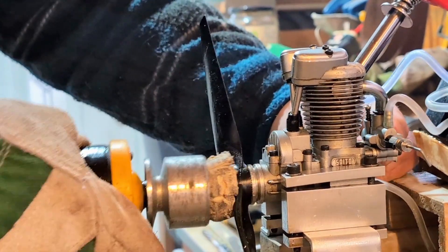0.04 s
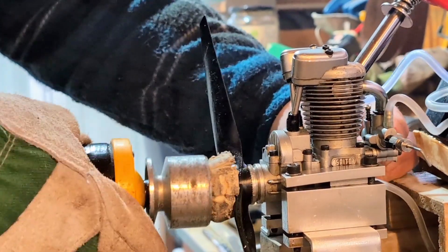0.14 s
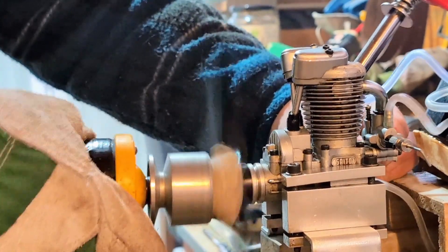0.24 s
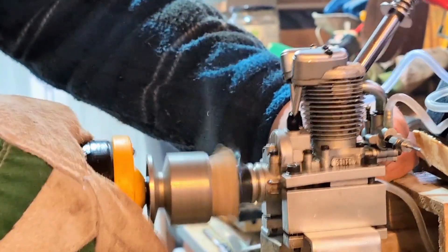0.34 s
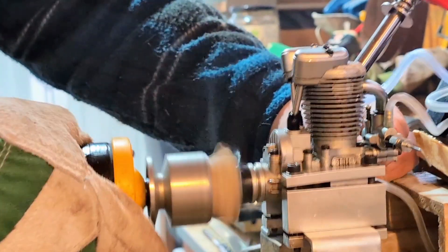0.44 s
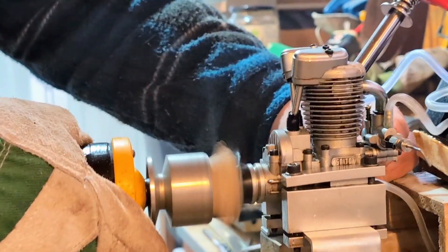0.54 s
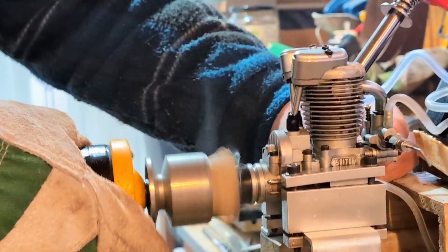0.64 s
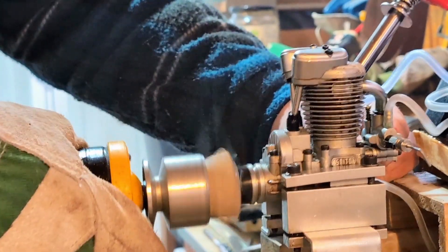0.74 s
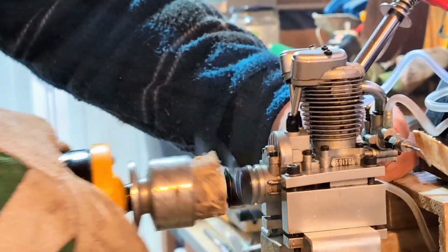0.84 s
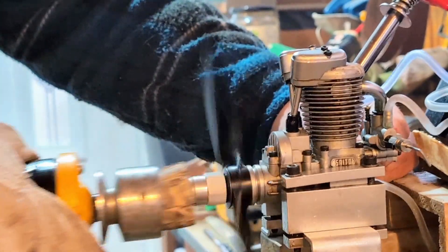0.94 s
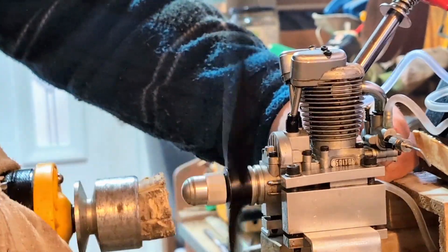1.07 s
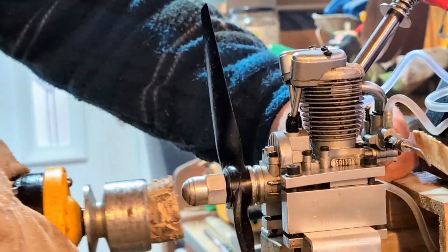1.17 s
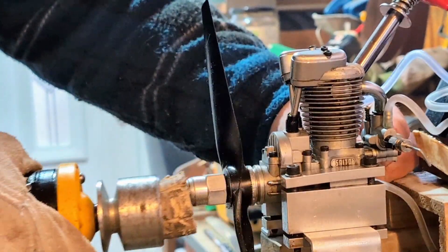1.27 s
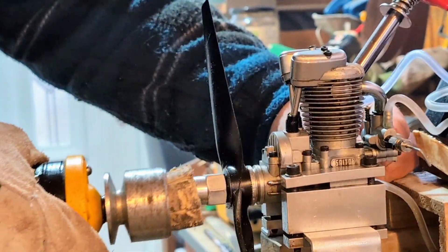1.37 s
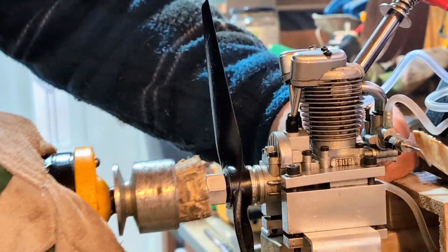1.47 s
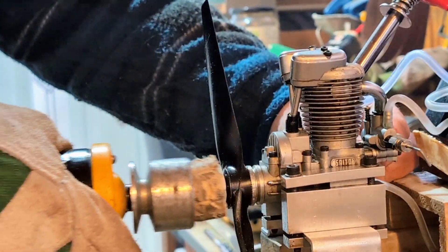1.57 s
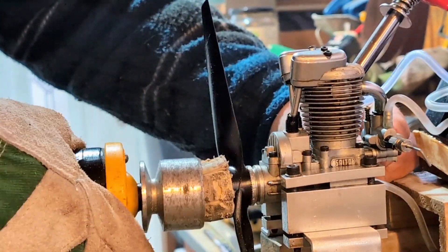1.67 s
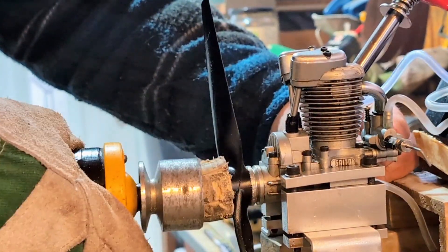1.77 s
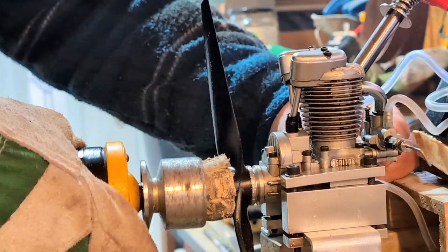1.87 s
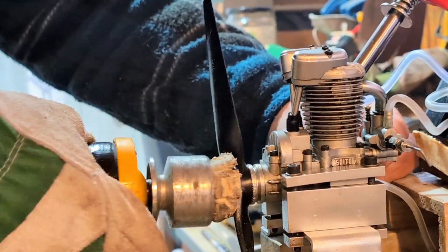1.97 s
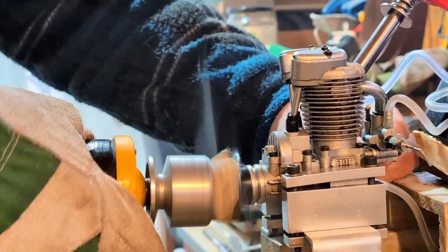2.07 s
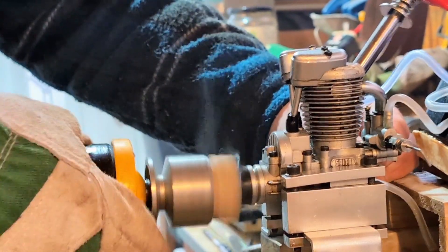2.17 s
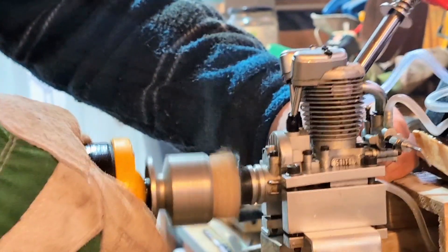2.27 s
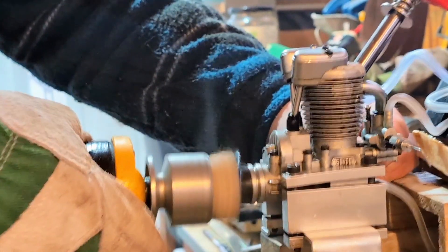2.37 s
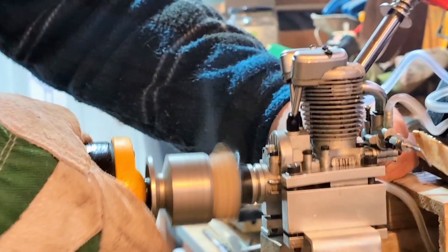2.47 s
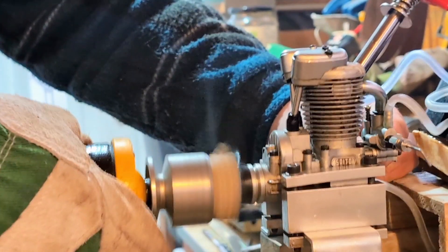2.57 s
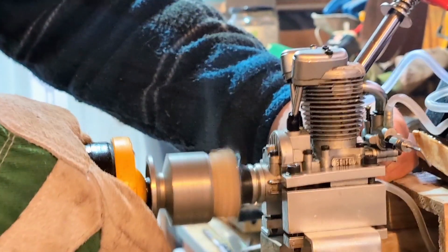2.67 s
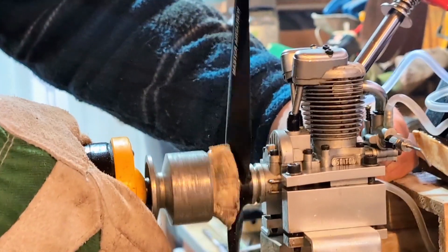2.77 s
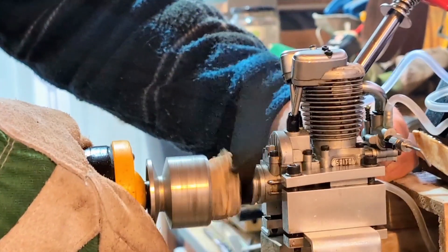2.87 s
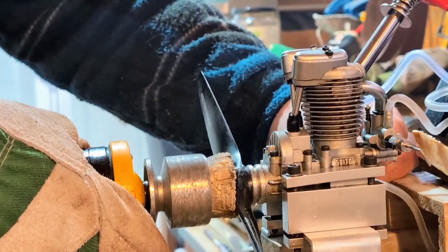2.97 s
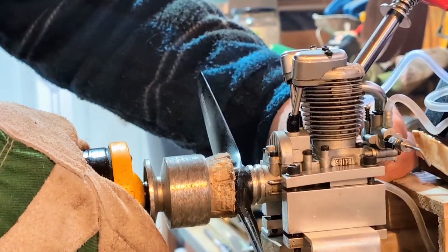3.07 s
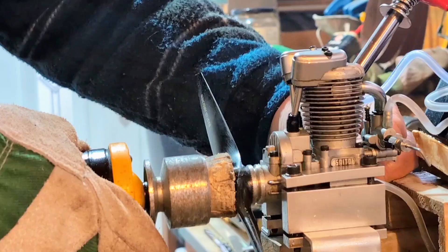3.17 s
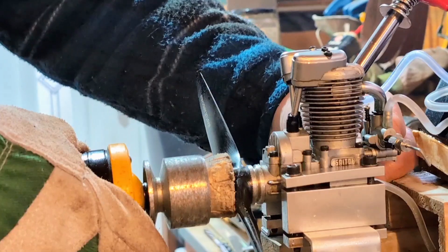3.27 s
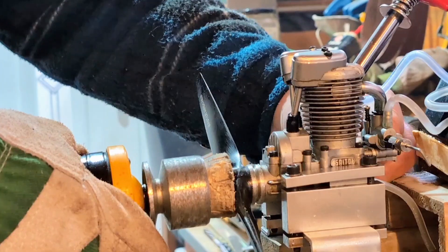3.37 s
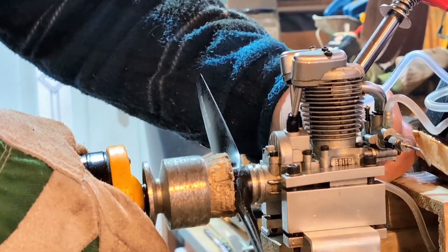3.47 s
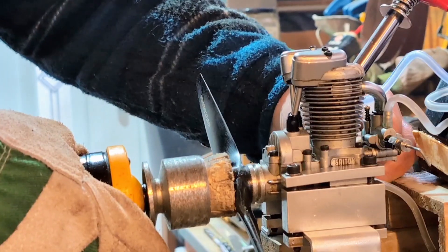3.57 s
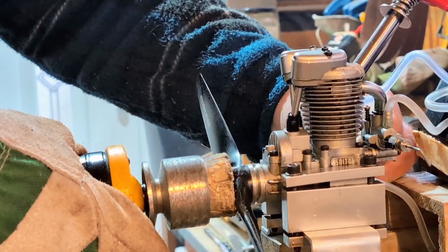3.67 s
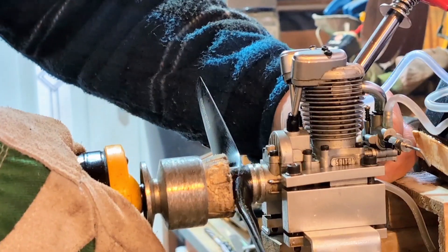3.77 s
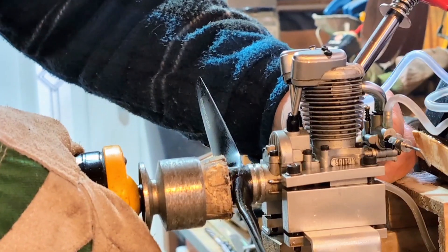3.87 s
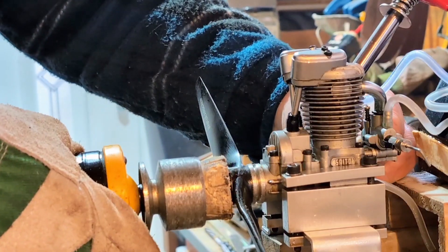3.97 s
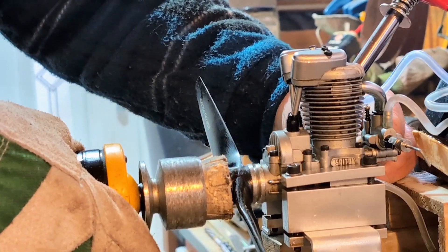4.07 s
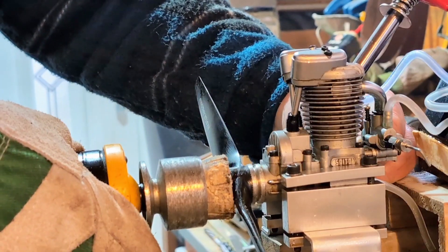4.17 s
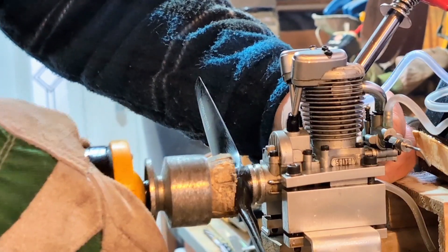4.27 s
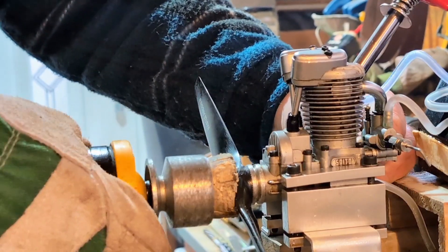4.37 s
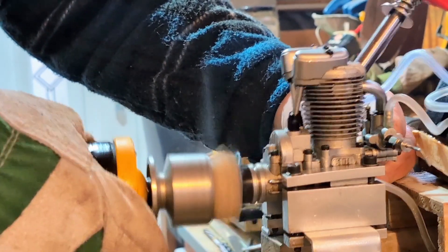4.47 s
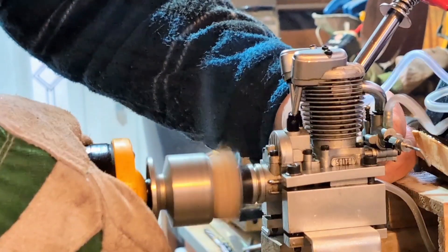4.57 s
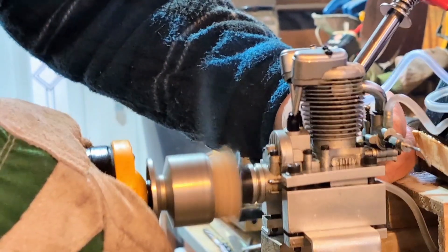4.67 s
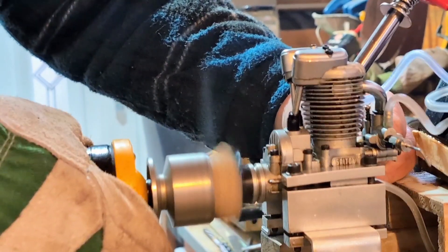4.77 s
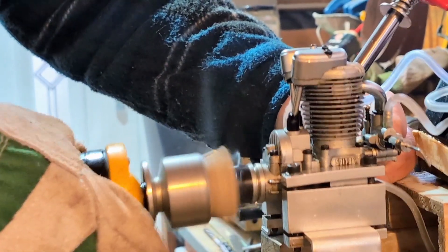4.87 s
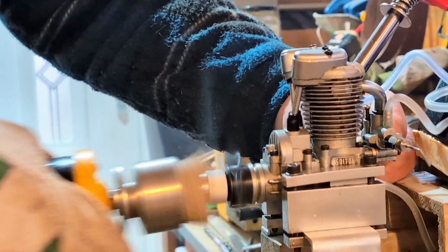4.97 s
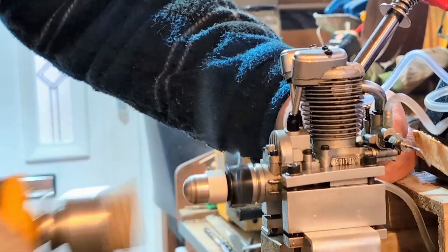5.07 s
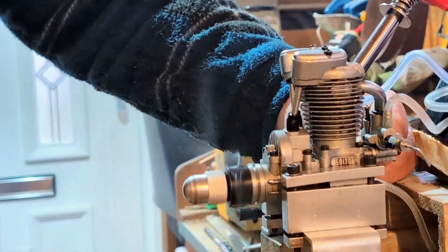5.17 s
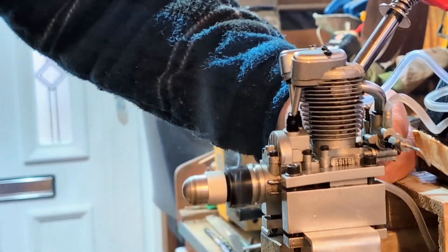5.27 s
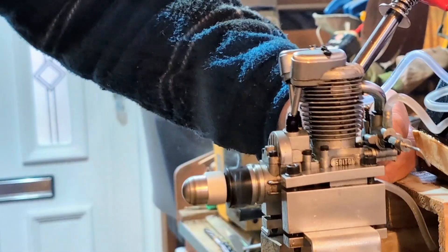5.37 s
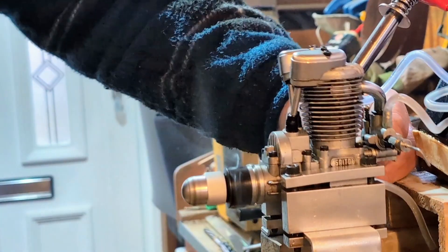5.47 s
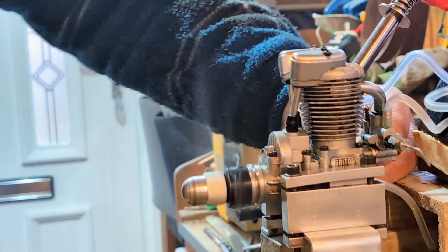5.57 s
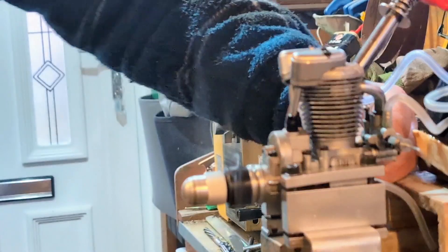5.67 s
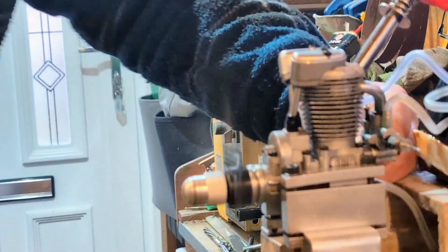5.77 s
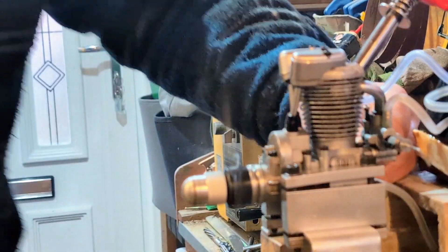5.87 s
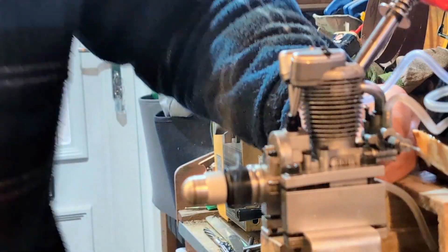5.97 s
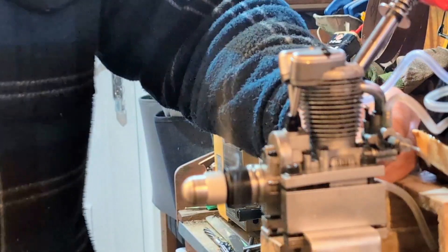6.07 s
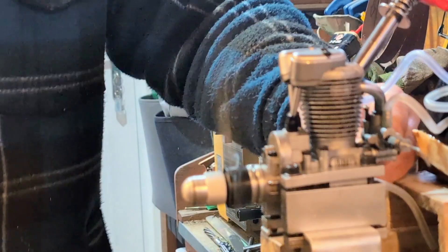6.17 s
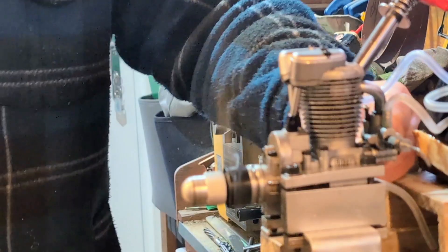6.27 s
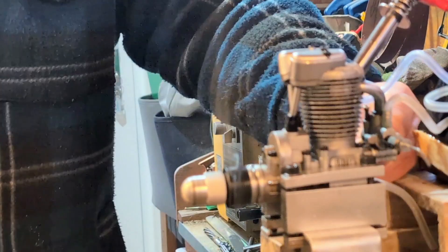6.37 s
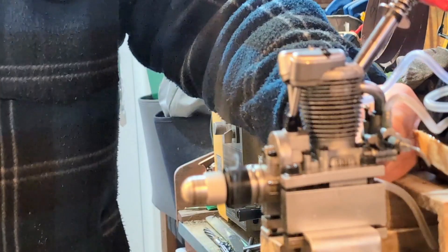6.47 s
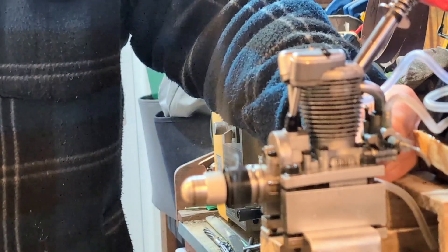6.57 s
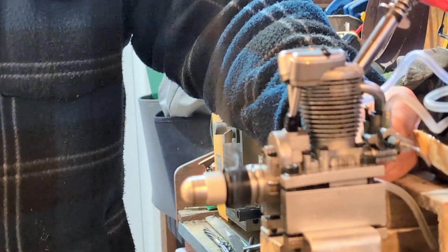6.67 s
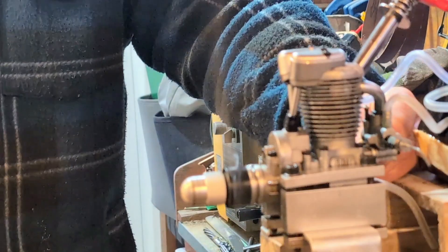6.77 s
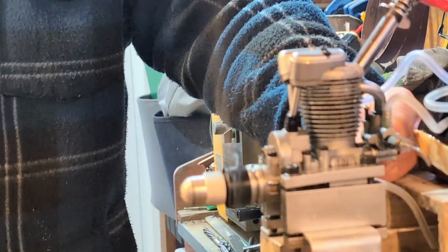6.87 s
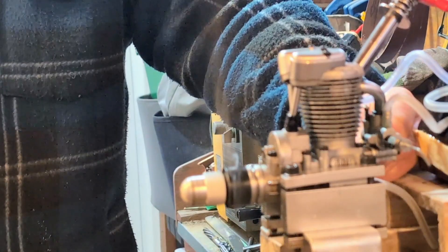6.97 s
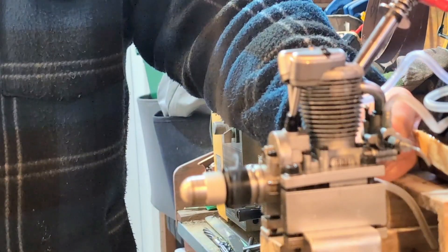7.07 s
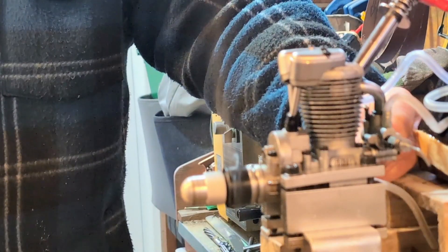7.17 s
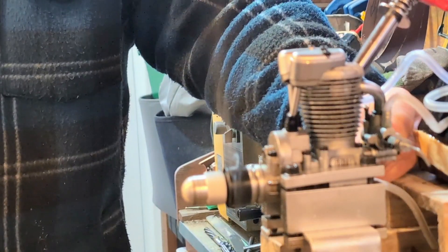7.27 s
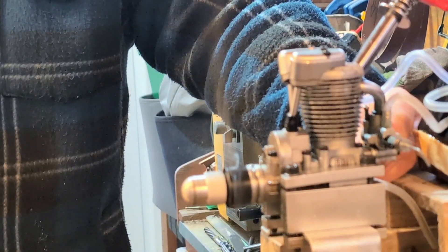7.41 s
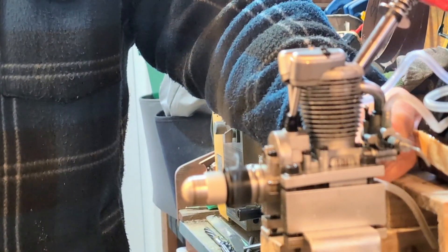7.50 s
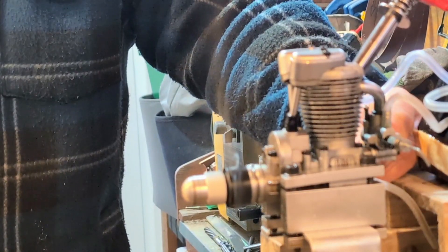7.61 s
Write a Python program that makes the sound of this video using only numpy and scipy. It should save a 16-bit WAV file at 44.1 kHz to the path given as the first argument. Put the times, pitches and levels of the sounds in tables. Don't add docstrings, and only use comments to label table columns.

```python
import sys
import numpy as np
from scipy import signal
from scipy.fft import rfft, irfft, next_fast_len
from scipy.io import wavfile
from scipy.ndimage import uniform_filter1d, map_coordinates

SR = 44100
rng = np.random.default_rng(int(sys.argv[2]) if len(sys.argv) > 2 else 0)


def volts_from_decibels(level):
    exponent = np.asarray(level, float) / 20
    return 10 ** exponent


def pcm_store(signal):
    levels = np.round(np.clip(np.atleast_2d(signal), -1, 1) * 32767)
    wavfile.write(sys.argv[1], SR, levels.astype(np.int16).T)


N = 336924
TIME_S = np.arange(N) / SR

# start_s, peak_db
POPS = [(4.638, -9.5), (4.688, -7), (4.729, -6.5), (4.7665, -9), (4.805, -6), (4.845, -7), (4.885, -6.5),
        (4.926, -7.5), (4.9675, -8.5), (5.0095, -7.5), (5.053, -8), (5.093, -5.5), (5.131, -7),
        (5.165, -5.5), (5.194, -9.5), (5.219, -11), (5.248, -8.5), (5.271, -8), (5.293, -6)]
# time_s, firing_rate_hz, exhaust_db
RUN = [(5.3, 45.2, -22), (5.37, 51, -17), (5.41, 51.5, -19), (5.5, 55.1, -18.5), (5.58, 56.0, -16.5),
       (5.72, 54.6, -18.5), (5.9, 50, -18), (6.07, 47.2, -18), (6.16, 52.2, -18.5), (6.24, 56, -19),
       (6.32, 58.5, -18), (6.55, 57.4, -19), (6.67, 61.7, -18), (6.8, 64.3, -18), (7.05, 67.3, -18),
       (7.18, 70.2, -18.5), (7.43, 76.2, -19), (7.64, 80.2, -20)]
# time_s, misfire (0 to 1)
MISFIRES = [(5.3, .24), (5.45, .06), (5.72, .05), (5.85, .1), (6.04, .15), (6.2, .14), (6.3, .04),
            (6.8, .06), (7.64, .06)]
# pitch_hz, level_db
PIPE = [(90, -24.5), (150, -6.5), (215, 2), (285, -3.5), (340, 1), (390, -3.5), (460, 2.5), (495, -2.5),
        (540, 3), (610, -3), (680, 2.5), (750, -6.5), (830, -3.5), (900, -7), (990, 0), (1110, -0.5),
        (1280, -10), (1500, -2.5), (1660, -2.5), (1800, -9), (1930, -5), (2150, -4.5), (2300, -19.5),
        (2900, -14.5), (3400, -22.5), (4500, -21.5), (7000, -35.5)]
# pitch_hz, left_minus_right_db
OUTLET_TILT = [(200, -3.5), (380, 0.5), (550, -2.5), (780, -4.5), (1100, -0.5), (1600, 0), (2200, 2.5),
               (3000, -0.5)]
# pitch_hz, level_db (per Hz)
ROAR = [(70, -23.5), (120, -8), (300, -8.5), (550, -12.5), (900, -14), (1650, -9.5), (2250, -3.5),
        (2960, -4), (3450, -7), (4370, -4.5), (5100, -7), (6240, -3), (9000, -9), (11600, -9.5),
        (12200, -17), (16000, -16.5)]
# pitch_hz, width_hz, level_db
FINS = [(2900, 100, -0.5), (4290, 170, -4.5), (5400, 110, 3.5), (6040, 270, -8)]
# pitch_hz, level_db (per Hz)
SIZZLE = [(5000, -41.5), (8000, -5.5), (10600, -1), (11700, -8), (12300, -6.5), (16000, -11)]
# delay_s, level_db
SPITS = [
    (0, 4),
    (.0023, -2),
    (.0056, -1),
]
# pitch_hz, level_db
ROCKING = [(46, -33), (52, -27.5), (55, -22.5), (58, -18.5), (63.5, -19.5), (66, -31), (71, -37.5),
           (80, -24)]
SHAFT = [(92, -28.5), (102, -42), (110, -32.5), (117, -29.5), (128, -30), (140, -24), (152, -30.5),
         (160, -26.5)]
PROPELLER = [(182, -20), (205, -23), (222, -21.5), (234, -29), (247, -34), (260, -22), (280, -24),
             (320, -19.5)]
# time_s, effort_db
CRANKING = [
    [(.325, -58.5), (.41, -40), (.542, -25.5), (.588, -22), (.74, -25.5), (.896, -32), (1.012, -47),
     (1.132, -55.5), (1.3, -73)],
    [(2.17, -85), (2.298, -30.5), (2.43, -28.5), (2.51, -24.5), (2.684, -23.5), (2.84, -29.5),
     (2.93, -38.5), (3.0, -53), (3.2, -81)],
    [(4.55, -77), (4.638, -25.5), (4.7, -24.5), (4.816, -23), (5.078, -25.5), (5.2, -24.5), (5.33, -22.5)],
]
# start_s, peak_db
PUFFS = [(0.3212, -44), (.408, -7.5), (.5151, -8.5), (0.569, -9), (0.6169, -8), (0.6609, -8), (0.71, -13),
         (0.7528, -10.5), (0.8115, -11), (0.895, -15.5), (2.2174, -32.5), (2.2711, -15.5), (2.346, -14.5),
         (2.4117, -9), (2.4662, -12), (2.506, -10), (2.5216, -10.5), (2.5658, -12), (2.609, -8),
         (2.658, -11), (2.706, -11.5), (2.748, -9.5), (2.8052, -12), (2.8816, -14), (2.998, -26.5),
         (4.572, -33), (4.581, -21.5), (4.657, -13)]
# start_s, peak_db
TICKS = [(.2385, -46), (.369, -29), (0.976, -21), (1.027, -15.5), (1.049, -20), (1.1053, -22),
         (1.1606, -33), (1.225, -52.5), (2.119, -26.5), (2.135, -20), (2.252, -13.5), (4.588, -17.5)]
# pitch_hz, level_db
GEARS = [(290, -49), (500, -13.5), (712, -11), (1130, -8), (2560, -9.5), (2900, -11.5), (3490, -7.5),
         (4980, -8.5), (6000, -12), (7800, -27.5), (13200, -120)]
# pitch_hz, width_hz, level_db
GEAR_PEAKS = [(970, 48, -1.5), (1150, 260, -9), (1665, 37, 1), (1830, 72, -6), (2080, 120, -1.5),
              (2903, 34, 7)]
# pitch_hz, level_db (per Hz)
RUMBLE = [(53, -40.5), (90, 2), (151, -7.5), (426, -6.5), (456, -5), (575, -40.5), (700, -20), (910, -40),
          (1540, -120)]
# pitch_hz, level_db (per Hz)
AIR = [(2060, -33), (3500, -7), (4970, -12), (5060, -10.5), (8800, -5.5), (9090, -13), (10900, -6.5),
       (13500, -13), (15700, -18.5), (16000, -39.5)]
# pitch_hz, width_hz, level_db
AIR_PEAKS = [(6520, 740, -0.5), (9350, 97, 3), (10640, 100, -3), (12400, 27, -11.5)]
# pitch_hz, level_db (per Hz)
TAPPET = [(1800, -34.5), (3500, -16), (4400, 11.5), (5200, -14), (7500, -5.5), (13000, -21), (16000, -23.5)]
# pitch_hz, level_db (per Hz)
PORT = [(5000, -29.5), (8000, -16), (10300, -2.5), (11800, -8), (13000, -27), (15000, -34), (16500, -45)]
# pitch_hz, width_hz, level_db
PORT_PEAKS = [(8050, 300, -2), (9700, 300, 2.5), (10740, 250, 3.5), (12600, 300, 0)]
# start_s, length_s, level_db
SQUEALS = [
    (0.625, .03, -30),
    (0.67, 0.04, -29),
    (2.494, 0.31, -25),
    (4.69, 0.053, -28.5),
]
SQUEAL_HZ = [4815, 9375, 15165]
# level_db, sag_db_per_s
SQUEAL_TONES = [(-1, 71.5), (-2, 49), (-21, 50.5)]
# start_s, peak_db, pitch_hz, thud_db, t60_s
KNOCKS = [(0.137, -52, 409, -20, 0.062), (0.184, -39.5, 590, -11, 0.068), (0.233, -41, 447.5, -10.5, 0.082),
          (0.245, -51.5, 385, 4, 0.062), (0.331, -44.5, 2080, -20.5, 0.031), (0.367, -32.5, 870, -12.5, 1),
          (1.161, -36, 1410, -16.5, 0.14), (1.224, -38, 1364, -27, 0.1), (1.241, -48, 1440, -22.5, 0.086),
          (1.258, -62, 2100, -23.5, 0.082), (1.269, -48, 950, -20.5, 0.08), (.994, -37, 2930, -30, 0.051),
          (1.05, -35, 1040, -22.5, .1), (3.07, -49, 3120, -30, .05), (3.53, -69, 900, -4.5, .08),
          (3.985, -59, 750, -9, 0.085), (1.806, -38, 1110, -17, 0.046), (1.808, -47.5, 360, -14, .06),
          (1.806, -53, 3470, -30, 0.029), (3.545, -49, 124, -40, 0.27), (3.72, -55, 125, -30, .25),
          (1.27, -54.5, 150, -30, 0.19), (2.071, -50.5, 1080, -5, 0.17), (2.119, -36, 970, -7, 0.16),
          (2.134, -33, 1000, -19, 0.17), (2.154, -33.5, 553, -19, 0.039), (3.065, -53.5, 444, -15, 0.057),
          (4.439, -63.5, 395, -25, 0.15), (4.44, -69, 680, -31, .12), (2.318, -33, 299, -10, .08),
          (2.38, -25.5, 974, -19.5, .06), (2.645, -24, 330, -12, .07), (2.688, -23, 230, -7.5, .06),
          (2.836, -21.5, 1150, -18.5, .06), (2.912, -27, 1050, -21, .06), (4.64, -26.5, 190, 0, 0.1),
          (3.0, -46, 199.6, -5, .12)]
# start_s, peak_db
CHINK = [
    (2.9999, -12.5),
]
# pitch_hz, level_db, t60_s
CONE = [(6300, -30, 0.088), (6670, -21, 0.13), (7660, -2, 0.027), (7480, -7, 0.15), (8888, -12, 0.082),
        (10350, -7, 0.12), (11100, -33, 0.16), (11800, -26, 0.28), (12940, -27, 0.096), (14430, -34, 0.24)]
# start_s, peak_db
CLICKS = [
    (0.096, -40.5),
    (3.153, -41),
    (3.911, -40),
    (4.5253, -37.5),
]
# pitch_hz, level_db (per Hz)
SWITCH = [(710, -42), (1200, -19), (1380, -33), (1680, -4), (1870, -8), (2060, 4.5), (2260, -16),
          (2650, -22), (4590, -9.5), (7230, -19), (7710, -24), (10300, -15), (15000, -29)]
# start_s, length_s, level_db, pitch_hz
SHOVES = [(0.388, 0.17, -28, 64.17), (0.591, 0.14, -31, 61.1), (0.731, 0.054, -29.5, 74),
          (0.847, .09, -34, 64.15), (1.198, .5, -48.5, 59.65), (2.315, 0.13, -32, 66.3),
          (2.497, 0.24, -27, 79.45), (2.773, 0.19, -31.5, 62.56), (3.158, 0.08, -45, 53.05),
          (3.306, 0.31, -37.5, 58.22), (3.764, .1, -44.5, 58), (3.94, 0.33, -46, 57.63),
          (4.308, .2, -48.5, 55.8), (4.63, 0.17, -28.5, 63.1), (4.752, 0.11, -23, 59),
          (4.912, .13, -32.5, 71.2), (5.076, 0.21, -29, 58.2), (5.244, 0.092, -27.5, 80.6)]
# pitch_hz, level_db (per Hz)
SHAKE = [(16, -43.5), (28, -16), (43, -1.5), (65, 5), (77, -8), (87, -20), (118, -14), (220, -59),
         (290, -88.5), (480, -120)]
# start_s, length_s, level_db
RUSTLES = [
    (1.905, .3, -57),
    (2.998, 0.48, -62.5),
    (3.803, 0.15, -61.5),
]
# pitch_hz, level_db (per Hz)
SLEEVE = [(100, -6), (150, -3), (400, -8.5), (1200, -7), (2500, -17), (6000, -22.5), (8000, -35),
          (14000, -51)]
# pitch_hz, level_db (per Hz)
ROOM_AIR = [(88, -32), (150, -5.5), (215, -15.5), (876, -20), (1020, -21.5), (1190, -20), (2100, -23),
            (2690, -26.5), (4480, -21), (4930, -28.5), (14000, -46)]
# pitch_hz, level_db (rms)
WHINE = [(1034, -85.5), (1254, -89.5), (1550, -78.5), (2067, -79.5), (2326, -91.5), (3618, -85.5),
         (3871, -88), (4387, -78), (4646, -101.5), (7490, -98)]
# pitch_hz, likeness (-1 to 1)
ALIKE = [(60, 1), (130, 0.94), (290, 1), (640, 0.032), (1410, -0.072), (3100, 0.1), (6820, -0.06),
         (15000, 0.17)]
# pitch_hz, t60_s
ROOM_DECAY = [(150, 0.25), (1000, 0.76), (4000, 1), (12000, 0.049)]
# pitch_hz, level_db
ECHOES = [(250, -10.5), (400, -5.5), (520, 4.5), (3000, 2.5)]
# pitch_hz, left_minus_right_db
MIC_TILT = [(60, 0), (110, -10), (200, 3), (380, -5), (700, 1), (1290, 0), (2380, 0.5), (4400, -3),
            (8120, -10.5), (15000, -2.5)]
# start_s, level_db
DUCKS = [
    (7.302, -6.5),
    (7.399, -1.5),
]

SPEEDUP, HUM_IN_S = 110, .14
STEADY = .05
EDGE_HZ, EDGE_DB, EDGE_S = 700, 1.3, .00003
SLUG_S, LEAD_S, LEAD_DB = .0035, .0025, -10
ECHO_S, ECHO_SHARE, ECHO_HZ = 0.00232, 0.4, 2620
LAG_HZ = 1100
ROCK_MISFIRE_DB, PROP_MISFIRE_DB = 42, 21.5
CASE_ORDER, CASE_HZ, CASE_WIDE_HZ, CASE_DB = 6, 350, 39.6, -28
HISS_DB, CATCH_DB = -17.5, -4
CATCH_S, CAUGHT_S = 5.02, 5.35
CRACK_T60_S = .011
SIZZLE_DB, SIZZLE_GROWS, ROAR_GROWS = -24, 0.12, -0.054
RUMBLE_GROWS, RUMBLE_DB, RUMBLE_TOP_DB = 0.85, -12, -31
AIR_GROWS, AIR_DB, GEAR_GROWS, GEAR_DB = 1.27, 0.5, 1.173, 6.5
COAST_HZ, COAST_GROWS, COAST_DB = 2140, 0.57, -14.5
RATTLE_SLOW_DB, RATTLE_FAST_DB = 1.1, 2.4
PUFF_T60_S, PUFF_RISE_S, LEAK_DB = 0.12, 0.0043, -21.5
SLOW_PUFF, SHARP_DB = 0.71, -25
CLACK_DB, CLACK_T60_S, CLACK_RISE_S, TICK_CLACK_T60_S = -32, 0.28, 0.00091, .08
TICK_DB, TICK_T60_S = -15.5, 0.045
SNAP_DB, SNAP_T60_S, SNAP_RISE_S = 2.5, 0.031, 0.004
SQUEAL_RISE_S, SQUEAL_FALL_DB_S = 0.025, 606
BENCH_RISE_S, BENCH_SAG_DB_S, BENCH_FALL_DB_S, BENCH_IDLE_DB, BENCH_HZ = 0.031, 22.5, 193, -53.5, 59
QUIET_DB = -74
TOP_HZ, CLIP, DUCK_BACK_S = 15750, .9, 0.026


def engine():
    (rate, exhaust_db), _ = curves(RUN)
    early = np.maximum(RUN[0][0] - TIME_S, 0)
    rate = np.maximum(rate - SPEEDUP * early, 20)
    hum_in = np.clip(1 - early / HUM_IN_S, 0, 1) ** 2
    misfire = np.interp(TIME_S, *np.transpose(MISFIRES))
    cycle = np.cumsum(rate) / SR
    cycle = cycle - cycle[round((POPS[-1][0] + .0025) * SR)]
    at, uneven, size_db = firings(cycle)
    blast = exhaust_blast(at, uneven, size_db, rate, exhaust_db)
    tones = shaft_tones(cycle, rate, misfire)
    return volts_from_decibels(1.03) * blast + hum_in * tones + exhaust_hiss(at, size_db, rate)


def firings(cycle):
    at = np.flatnonzero(np.diff(np.floor(np.maximum(cycle, 0))))
    uneven = np.interp(at / SR, *np.transpose(MISFIRES))
    size_luck, time_luck = rng.standard_normal((2, len(at)))
    size_db = uneven * (5 * (-1) ** np.arange(len(at)) + 5 * size_luck)
    slip = np.round(uneven ** 2 * 0.004 * SR * time_luck + .002 * SR).astype(int)
    return np.clip(at + slip, 0, N - 1), uneven, size_db


def exhaust_blast(at, uneven, size_db, rate, exhaust_db):
    edge_size, edge_time = rng.standard_normal((2, len(at)))
    body = np.zeros(N)
    body[at] = volts_from_decibels(exhaust_db[at] + size_db + 0.5) * np.sqrt(SR / rate[at])
    edge = np.zeros(N)
    edge_at = at + np.round(EDGE_S * uneven / STEADY * SR * edge_time).astype(int)
    edge[np.clip(edge_at, 0, N - 1)] = body[at] * volts_from_decibels(EDGE_DB * np.sqrt(uneven / STEADY) * edge_size)
    dull = lambda hz: 1 / (1 + (hz / EDGE_HZ) ** 4)
    fire = filtered(body, dull) + filtered(edge, lambda hz: 1 - dull(hz))

    pop_s, pop_db = np.transpose(POPS)
    slow = np.zeros(N)
    slow[np.round((pop_s + SLUG_S) * SR).astype(int)] = volts_from_decibels(pop_db + 22.5)
    slow += volts_from_decibels(LEAD_DB) * np.roll(slow, -round(LEAD_S * SR))
    fire += uniform_filter1d(slow, size=35)

    pipe = causal(PIPE)
    blast = -signal.fftconvolve(fire, pipe / np.linalg.norm(pipe))[:N]

    def echoes(hz):
        trip = np.exp(-2j * np.pi * hz * ECHO_S) / (1 + 1j * hz / ECHO_HZ)
        return np.sqrt(1 - ECHO_SHARE ** 2) / (1 - ECHO_SHARE * trip)

    lag = lambda hz: (1 - 1j * hz / LAG_HZ) / (1 + 1j * hz / LAG_HZ)
    blast = filtered(blast, lambda hz: echoes(hz) * lag(hz))
    blast = room(blast, wet_db=-2.5, side_db=-1.5, size=.17)
    return filtered(blast, lambda hz: volts_from_decibels(np.outer([.5, -.5], along(OUTLET_TILT, hz))))


def shaft_tones(cycle, rate, misfire):
    rock_db = along(ROCKING, rate) - ROCK_MISFIRE_DB * misfire
    shaft_db = along(SHAFT, 2 * rate)
    prop_db = along(PROPELLER, 4 * rate) - PROP_MISFIRE_DB * misfire
    case = volts_from_decibels(CASE_DB) / (1 + ((CASE_ORDER * rate - CASE_HZ) / CASE_WIDE_HZ) ** 2)
    tones = volts_from_decibels(rock_db + 1) * np.sin(2 * np.pi * cycle + 1.9)
    tones += volts_from_decibels(shaft_db + 2.0) * np.sin(4 * np.pi * cycle + 2.7)
    tones += volts_from_decibels(prop_db + 3.0) * np.sin(8 * np.pi * cycle + 0.34)
    tones += case * np.sin(2 * np.pi * CASE_ORDER * cycle + 1.1)
    drift = np.array([wobble(28), wobble(34)]).cumsum(0) / [[1], [1.4]]
    return volts_from_decibels((1.4 + 4 * misfire) * drift) * tones


def exhaust_hiss(at, size_db, rate):
    pop_s, pop_db = np.transpose(POPS)
    jet = decay(at / SR, size_db - 8.5, 0.12, rise=0.0031)
    jet += decay(pop_s, pop_db + 8.5, 0.037, rise=0.0015)
    spit = sum(decay(at / SR + s, size_db + db, CRACK_T60_S, rise=.0004) for s, db in SPITS)
    spit += decay(pop_s + .0012, pop_db + 12.5, CRACK_T60_S, rise=.0004)
    caught = np.interp(TIME_S, [CATCH_S, CAUGHT_S], [0, 1])
    started = np.clip((TIME_S - pop_s[0] + 0.0019) / 0.011, 0, 1)
    flutter_db = 0.3 * wobble(3.9) + 0.54 * wobble(12) + 0.54 * wobble(180)
    flow = volts_from_decibels(HISS_DB + CATCH_DB * (1 - caught) + flutter_db) * (0.5 + 0.75 * jet + .5 * spit) * started
    roar = rush(ROAR, FINS, peak_db=-12.0, patchy_db=1.5, wide=3.0, long=3.0)
    roar = volts_from_decibels(ROAR_GROWS * (rate - 58.0)) * roar
    sizzle = rush(SIZZLE, patchy_db=3, wide=4.0, long=3.0)
    sizzle = volts_from_decibels(SIZZLE_DB - HISS_DB + SIZZLE_GROWS * (rate - 60.5)) * sizzle
    return flow * (roar + sizzle)


def starter():
    whirr = rush(GEARS, GEAR_PEAKS, peak_db=5.5, patchy_db=1.66, wide=2.2, long=4.0)
    rumble = rush(RUMBLE)
    air = rush(AIR, AIR_PEAKS, peak_db=8.5, patchy_db=2.0)
    whirr = unit(whirr * volts_from_decibels(RATTLE_SLOW_DB * wobble(40) + RATTLE_FAST_DB * wobble(260)))
    coast = filtered(whirr, lambda hz: 1 / (1 + (hz / COAST_HZ) ** 6))
    out = np.zeros((2, N))
    for rows in CRANKING:
        (effort_db,), gate = curves(rows)
        rumble_db = np.minimum(RUMBLE_GROWS * effort_db + RUMBLE_DB, RUMBLE_TOP_DB) + 3.1 * wobble(25)
        out += gate * volts_from_decibels(COAST_GROWS * effort_db + COAST_DB) * coast
        out += gate * volts_from_decibels(GEAR_GROWS * effort_db + GEAR_DB) * whirr
        out += gate * volts_from_decibels(rumble_db) * rumble
        out += gate * volts_from_decibels(AIR_GROWS * effort_db + AIR_DB) * air
    out += valve_strokes(PUFFS, -9, CLACK_DB, CLACK_T60_S, air, whirr)
    out += valve_strokes(TICKS, LEAK_DB, -16, TICK_CLACK_T60_S, air, whirr)
    return out + tappets_and_port() + cone_squeal()


def valve_strokes(events, puff_db, clack_db, clack_t60, air, whirr):
    s, db = np.transpose(events)
    slower_db = SLOW_PUFF * np.clip(-17.0 - db, 0, 12) * (db > SHARP_DB)
    puff = decay(s, db + puff_db, PUFF_T60_S, PUFF_RISE_S * volts_from_decibels(slower_db))
    clack = decay(s, db + clack_db, clack_t60, CLACK_RISE_S)
    return puff * air[:, ::-1] + clack * whirr


def tappets_and_port():
    s, db = np.transpose(TICKS)
    ticks = decay(s, db + TICK_DB, TICK_T60_S, CLACK_RISE_S) * rush(TAPPET)
    s, db = np.transpose(PUFFS)
    rise = SNAP_RISE_S * volts_from_decibels(SLOW_PUFF * np.clip(-10.0 - db, 0, 12))
    port = rush(PORT, PORT_PEAKS, peak_db=3.0, patchy_db=1.0)
    return ticks + decay(s, db + SNAP_DB, SNAP_T60_S, rise) * port[:, ::-1]


def cone_squeal():
    out = np.zeros((2, N))
    turn = 2 * np.pi * np.cumsum(1 + .0022 * wobble(60)) / SR
    for hz, (level_db, sag_db) in zip(SQUEAL_HZ, SQUEAL_TONES):
        slip = sum(swell(s, length, db + level_db, SQUEAL_RISE_S, sag_db, SQUEAL_FALL_DB_S)
                   for s, length, db in SQUEALS)
        out += slip * volts_from_decibels(6.0 + 3.0 * wobble(45)) * np.sin(hz * turn + rng.uniform(0, 2.3, (2, 1)))
    return out


def handling():
    touches = struck(CHINK, CONE, ring_db=-14.0) + hub_knocks()
    clacks = decay(*np.transpose(CLICKS), 0.15, rise=.0015) * volts_from_decibels(-7.0) * rush(SWITCH)
    return volts_from_decibels(2.5) * room(touches, wet_db=-7.5, side_db=-4.5, size=.25) + clacks


def hub_knocks():
    knocks, t = np.zeros(N + SR), np.arange(SR // 8) / SR
    band = lambda lo, hi, noise: unit(signal.lfilter(*signal.butter(2, [lo, hi], "band", fs=SR), noise))
    for s, db, hz, thud_db, t60 in KNOCKS:
        noise = rng.standard_normal(len(t))
        knock = band(0.27 * hz, 1.4 * hz, noise)
        knock += volts_from_decibels(-25.0) * (hz / 1000) ** 2 * band(2400, 6000, noise)
        knock += volts_from_decibels(thud_db + 8.5) * band(95, 240, noise)
        knock = 0.84 * knock + 1.2 * np.sin(2 * np.pi * hz * t) * volts_from_decibels(-60 * t / 0.11)
        knocks[round(s * SR):][:len(t)] += volts_from_decibels(db - 4.0 - 60 * t / t60) * knock
    return knocks[:N]


def struck(events, modes, ring_db):
    out, t = np.zeros(N + SR), np.arange(SR // 4) / SR
    for s, db in events:
        ring = np.zeros(len(t))
        for hz, level, t60 in modes:
            shiver = np.cumsum(rng.normal(0, 0.088, len(t)))
            ring += volts_from_decibels(level - 60 * t / min(t60, .1)) * np.sin(2 * np.pi * hz * t + shiver)
        out[round(s * SR):][:len(t)] += volts_from_decibels(db + ring_db) * ring * (1 - np.exp(-t / 0.00089))
    return out[:N]


def workshop():
    rustle = sum(swell(s, length, db, rise=0.26, sag_db=13.0, fall_db=49.0) for s, length, db in RUSTLES)
    whine = sum(volts_from_decibels(db + 1) * np.sin(2 * np.pi * hz * TIME_S + rng.uniform(0, 0.62, (2, 1)))
                for hz, db in WHINE)
    return bench() + rustle * rush(SLEEVE, patchy_db=2.0) + volts_from_decibels(QUIET_DB) * rush(ROOM_AIR) + whine


def bench():
    shoves = np.array([swell(s, length, db, BENCH_RISE_S, BENCH_SAG_DB_S, BENCH_FALL_DB_S)
                       for s, length, db, hz in SHOVES])
    size = shoves.sum(0) + volts_from_decibels(BENCH_IDLE_DB)
    shake_hz = (np.transpose(SHOVES)[-1] @ shoves + volts_from_decibels(BENCH_IDLE_DB) * BENCH_HZ) / size
    hum = np.sin(2 * np.pi * np.cumsum(shake_hz + 3 * wobble(17)) / SR)
    hum = np.sqrt(2) * hum * volts_from_decibels(2.1 * wobble(22))
    return size * hum + size ** 0.72 * volts_from_decibels(-16.5) * rush(SHAKE)


def swell(start, length, db, rise, sag_db, fall_db):
    t = np.maximum(TIME_S - start, 0)
    return np.minimum(t / rise, 1) ** 2 * volts_from_decibels(db - sag_db * t - fall_db * np.maximum(t - length, 0))


def decay(times, db, t60, rise):
    env, t = np.zeros(N + SR), np.arange(SR // 5) / SR
    for s, level, life, attack in np.broadcast(times, db, t60, rise):
        env[round(s * SR):][:len(t)] += volts_from_decibels(level - 60 * t / life) * (1 - np.exp(-t / attack))
    return env[:N]


def rush(spectrum, peaks=(), peak_db=0, patchy_db=0, wide=3, long=4):
    turn = lambda hz: np.arccos(np.clip(along(ALIKE, hz), -1, 1)) / 2
    colour = lambda hz: volts_from_decibels(along(spectrum, hz)) * (1 + volts_from_decibels(peak_db) * abs(resonances(peaks)(hz)))
    pair = rng.standard_normal((2, N))
    if patchy_db:
        z = signal.stft(pair, nperseg=512)[2]
        field = rng.standard_normal(z.shape[1:])
        field = uniform_filter1d(field, round(wide), axis=0)
        field = uniform_filter1d(field, round(long), axis=1)
        pair = signal.istft(z * volts_from_decibels(patchy_db * unit(field)), nperseg=512)[1][:, :N]
    mid, side = filtered(pair, lambda hz: colour(hz) * [np.cos(turn(hz)), np.sin(turn(hz))])
    return unit(np.array([mid + side, mid - side]))


def room(x, wet_db, side_db, size):
    hz, t, z = signal.stft(rng.standard_normal((2, SR // 3)), SR, nperseg=256)
    fade = volts_from_decibels(-60 * t / (size * along(ROOM_DECAY, hz)[:, None]))
    tail = signal.istft(z * fade, SR, nperseg=256)[1]
    paths = rfft(tail / np.linalg.norm(tail[0]), SR // 2)
    strength = volts_from_decibels(along(ECHOES, np.fft.rfftfreq(SR // 2, 1 / SR)))
    ears = 1 + strength * (volts_from_decibels(wet_db) * paths[0] + volts_from_decibels(side_db) * paths[1] * [[1], [-1]])
    ears = ears / np.sqrt(uniform_filter1d(abs(ears) ** 2, size=9, axis=1))
    return signal.oaconvolve(x[None], irfft(ears, SR // 2)[:, :SR // 3], axes=1)[:, :N]


def resonances(peaks):
    return lambda f: sum((-1) ** k * volts_from_decibels(db) * 1j * f * w / (c * c - f * f + 1j * f * w)
                         for k, (c, w, db) in enumerate(peaks))


def causal(spectrum, size=8192):
    ceps = irfft(np.log(volts_from_decibels(along(spectrum, np.fft.rfftfreq(size, 1 / SR))) + 1e-6), size)
    ceps[1:size // 2] *= 2
    ceps[size // 2 + 1:] = 0
    return irfft(np.exp(rfft(ceps)), size)


def filtered(x, response):
    m = next_fast_len(N + SR // 4, True)
    return irfft(rfft(x, m) * response(np.fft.rfftfreq(m, 1 / SR)), m)[..., :N]


def wobble(rate):
    return map_coordinates(rng.standard_normal(int(N * rate / SR) + 4), [np.arange(N) * rate / SR])


def curves(rows):
    s, *cols = np.transpose(rows)
    gate = np.clip(np.minimum(TIME_S - s[0], s[-1] + .01 - TIME_S) / .01, 0, 1)
    return [np.interp(TIME_S, s, c) for c in cols], gate


def along(points, hz):
    f, v = np.transpose(points)
    return np.interp(np.log(hz + 1), np.log(f + 1), v)


def unit(x):
    return x / np.sqrt(np.mean(x ** 2) + 1e-20)


def scene():
    return engine() + starter() + handling() + workshop()


def band_limit(x):
    return signal.sosfilt(signal.butter(12, 16660, fs=SR, output="sos"), x)


def record(dry):
    tilt = lambda hz: volts_from_decibels(np.outer([.5, -.5], along(MIC_TILT, hz)))
    x = filtered(dry, lambda hz: tilt(hz) / (1 + (hz / TOP_HZ) ** 120))
    duck_db = sum(db * swell(s, 0, 0, rise=.004, sag_db=14.0 / DUCK_BACK_S, fall_db=-5.5) for s, db in DUCKS)
    x = x * volts_from_decibels(duck_db)
    x = x / (1 + abs(x / CLIP) ** 8) ** (1 / 8)
    return band_limit(x)


dry = scene()
out = record(dry)
pcm_store(out)
```